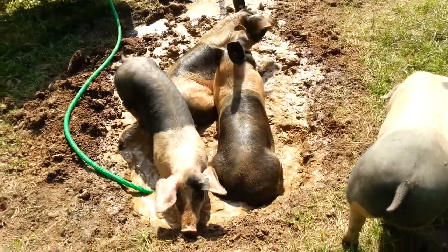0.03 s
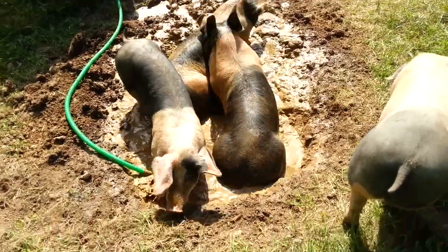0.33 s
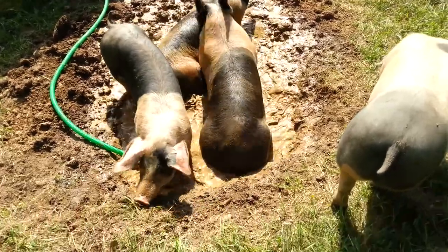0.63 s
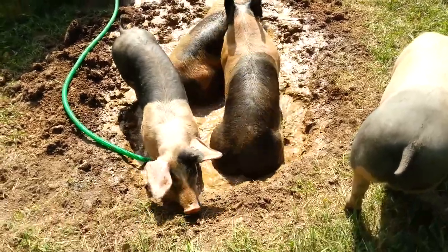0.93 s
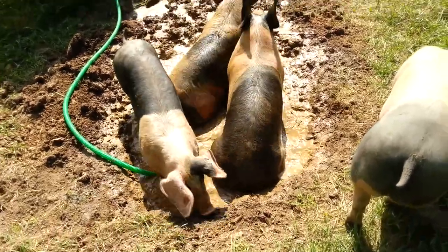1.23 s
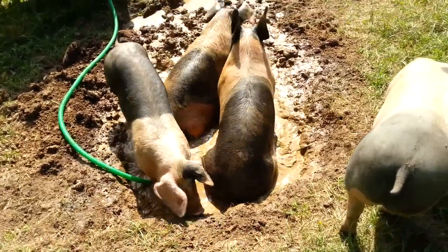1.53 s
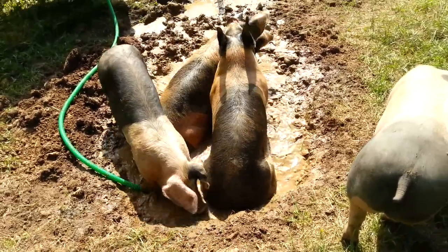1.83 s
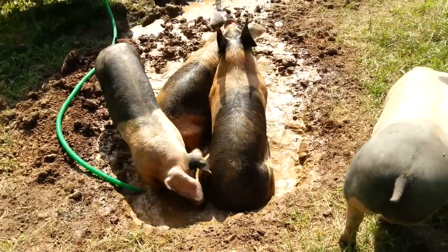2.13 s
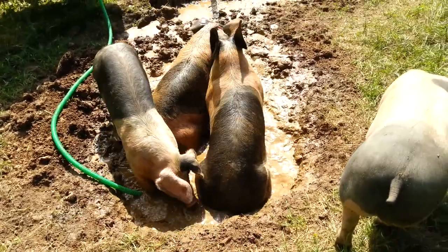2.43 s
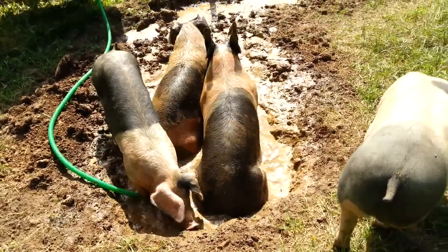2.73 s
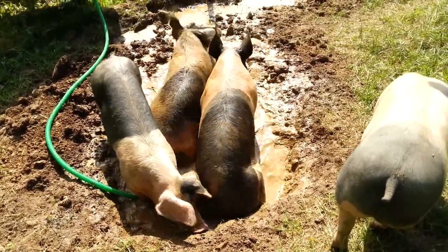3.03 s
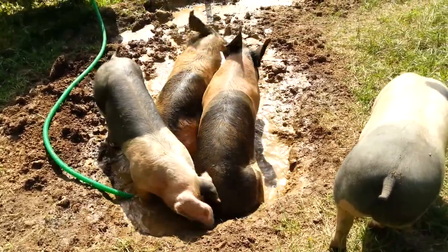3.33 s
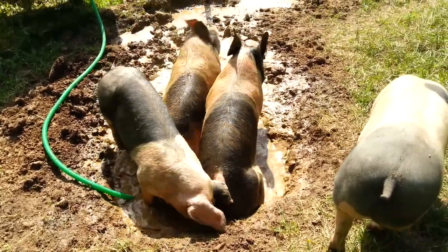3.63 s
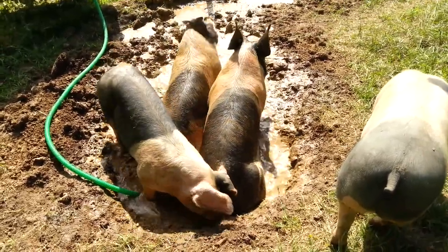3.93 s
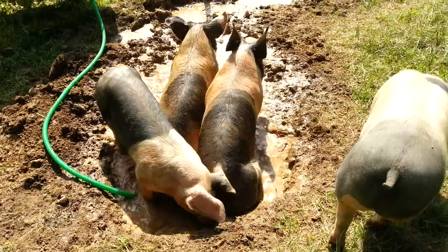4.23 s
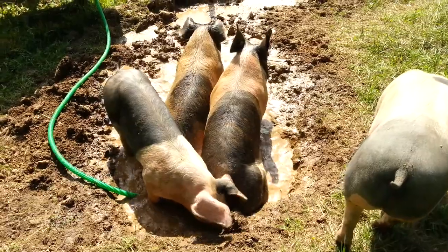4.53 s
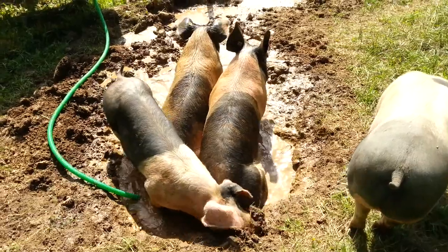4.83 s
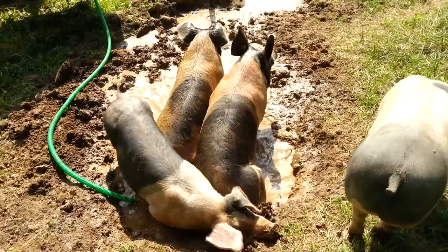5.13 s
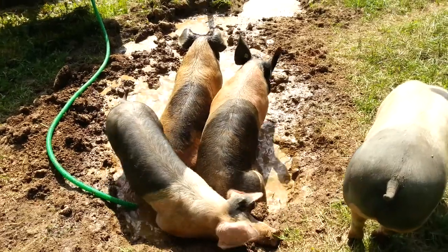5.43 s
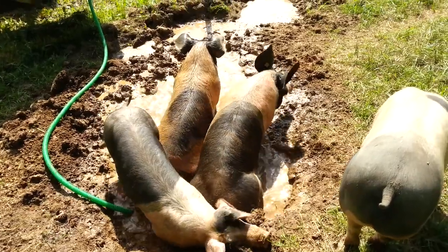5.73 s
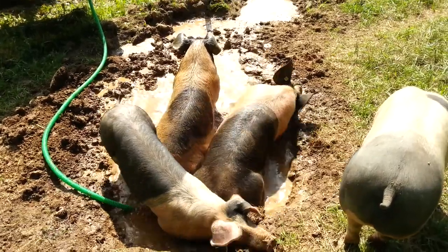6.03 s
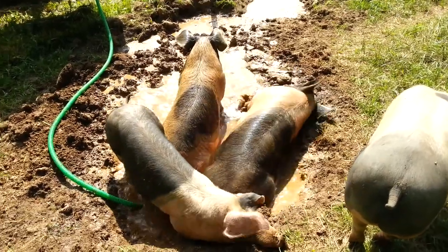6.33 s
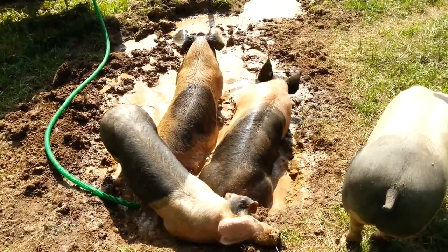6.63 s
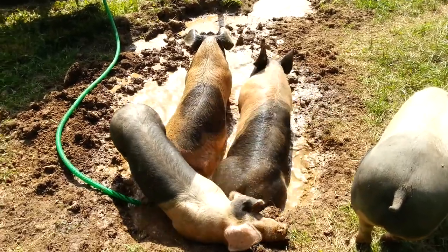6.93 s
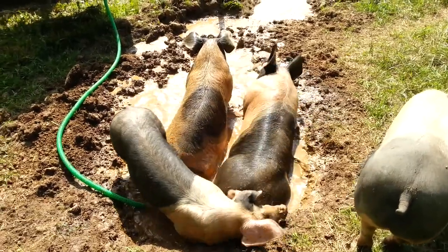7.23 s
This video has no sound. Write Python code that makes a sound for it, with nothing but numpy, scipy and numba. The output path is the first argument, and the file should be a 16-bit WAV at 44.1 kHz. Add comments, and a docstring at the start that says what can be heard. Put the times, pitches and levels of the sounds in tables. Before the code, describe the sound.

Pigs wade in a muddy puddle, sloshing and squelching with small plops, and one shakes itself in quick wet slaps.

```python
"""Pigs wade and root in a muddy puddle on a pasture, a few metres away, left of centre.
Their legs churn the water into clouds of small bubbles and fine spray; air pockets plop and gulp
in the mud, flung drops tick on wet ground and a rooting snout hisses. Just after three seconds one pig
shakes itself, slapping the wet about ten times a second. Behind: soft outdoor hiss and a faint whine."""
import sys
import numpy as np
from scipy import signal
from scipy.fft import rfft, irfft
from scipy.io import wavfile
from scipy.ndimage import uniform_filter1d, map_coordinates
from numba import njit

SR = 44100
rng = np.random.default_rng(int(sys.argv[2]) if len(sys.argv) > 2 else 0)


def materialize(psi):
    """Save the field psi as 16-bit PCM at rate SR to the path in sys.argv[1].

    A 1-D psi becomes a single channel; in a 2-D psi each row is a channel.
    """
    bounded = np.clip(np.atleast_2d(psi).T, -1, 1)
    quanta = np.round(bounded * 32767).astype(np.int16)
    wavfile.write(sys.argv[1], SR, quanta)


N = 325458
TIME_S = np.arange(N) / SR
FREQS_HZ = np.arange(N // 2 + 1) * SR / N

# spray spectrum: (frequency [Hz], gain [dB])
SPRAY_EQ = [(1500, 24), (3000, 4.5), (3900, 3), (5500, 1), (7000, 1.5), (8600, 1), (10000, -6.5),
            (14500, -1.5)]


def stirring():
    """Legs, flanks and snouts push through the puddle: gains of water, deep bubbles and spray."""
    # (peak time [s], rise [s], fall [s], water [dB], deep bubbles [dB], spray [dB])
    strokes = [(0.051, 0.094, 0.11, -36, -58, -38.5), (0.291, .09, 0.093, -30, -35.5, -35.5),
               (0.381, 0.036, 0.06, -28, -30, -35.5), (0.456, .045, 0.041, -29.5, -39, -37),
               (0.56, 0.087, 0.17, -35, -45, -38.5), (0.93, 0.31, 0.3, -43, -58.5, -50.5),
               (1.27, 0.16, 0.11, -47.5, -48, -49.5), (1.35, 0.043, 0.14, -40, -46.5, -48.5),
               (1.662, 0.16, 0.33, -35.5, -56.5, -40), (1.85, 0.02, 0.094, -45, -60.5, -43.5),
               (1.96, 0.015, .06, -42.5, -57, -50), (2.099, 0.073, 0.11, -38, -51, -52.5),
               (2.4, 0.17, 0.046, -48.5, -66, -53), (2.50, 0.085, 0.065, -41.5, -42.5, -45.5),
               (2.96, 0.041, 0.023, -46.5, -53, -56), (3.25, 0.26, 0.11, -47, -46, -49),
               (3.41, 0.14, 0.15, -35, -51, -36.5), (3.575, 0.067, 0.15, -33, -36, -35),
               (3.82, 0.068, 0.029, -35, -41, -35.5), (3.925, 0.08, 0.059, -32.5, -47, -39),
               (4.12, 0.061, 0.07, -45.5, -54.5, -45.5), (4.541, 0.05, 0.056, -50, -58.5, -52),
               (4.817, .012, 0.061, -50.5, -68, -53), (5.15, 0.03, 0.058, -48.5, -47, -49.5),
               (5.3, 0.074, 0.2, -49, -48.5, -53), (5.65, 0.089, .07, -43.5, -42.5, -42),
               (5.87, 0.22, 0.48, -37, -48, -54), (6.169, 0.028, 0.025, -30, -57, -35),
               (6.234, 0.034, 0.018, -40, -63, -34.5), (6.359, 0.035, 0.02, -27.5, -62, -36),
               (6.439, 0.025, .05, -32, -42, -43), (6.54, 0.06, 0.49, -42, -52.5, -49),
               (6.818, 0.025, 0.024, -40.5, -55, -39.5), (6.968, 0.15, 0.19, -38, -42.5, -49),
               (7.11, 0.032, 0.19, -40.5, -46.5, -50)]
    peak_s, rise_s, fall_s, *levels_db = np.transpose(strokes)
    return [np.hypot(swells(peak_s, rise_s, fall_s, db), undb(rest_db))
            for db, rest_db in zip(levels_db, (-58.5, -70.5, -56.5))]


def churn(water_gain, deep_gain, spray_gain):
    """Strokes stir the puddle in uneven surges; deep ones trap bigger bubbles."""
    surge = undb(2.7 * walk(rate_hz=58.28))
    deep = even(deep_bubbles(), window_s=0.11)
    body = undb(1.05) * water_gain * even(water(count=12000), window_s=0.04)
    body += undb(-2.5) * deep_gain * deep
    mist = undb(0.06 * walk(rate_hz=151.3) - 1) * even(spray(count=40000), window_s=0.1)
    drops = bubbles(3460, 12000, cycles=4.2, spread_db=3.5, bend=0.1, count=420)
    return surge * (body + spray_gain * (mist + undb(-14) * colour(drops, SPRAY_EQ)))


def water(count):
    """Mid-sized bubbles, damped by mud within a few cycles: a soft wash with thicker squelches."""
    # (frequency [Hz], gain [dB])
    water_eq = [(80, -51.5), (200, -15), (400, -30), (550, -4.5), (850, 3), (1400, 2.5), (1750, 0),
                (2150, 1), (2600, -8), (3200, -22.5), (5000, -52)]
    wash = bubbles(422.5, 3666, cycles=3.13, spread_db=3.5, bend=0.14, count=count)
    squelches = bubbles(450, 1895, cycles=4.6, spread_db=5, bend=0.27, count=600)
    return colour(wash + undb(-5) * squelches, water_eq)


def deep_bubbles():
    """Big bubbles ring low and die almost at once."""
    # (frequency [Hz], gain [dB])
    deep_eq = [(60, -43), (130, -33.5), (200, -6), (280, -10), (380, 4), (480, -2.5), (650, -3.5),
               (1200, -31.5)]
    return colour(bubbles(200, 560, cycles=1.54, spread_db=3, bend=0.22, count=1500), deep_eq)


def spray(count):
    """Tiny films burst; droplets patter on mud or ring in the water."""
    fizz = bubbles(2690, 13400, cycles=1.72, spread_db=-2.5, bend=0.047, count=count)
    patter = bubbles(7900, 14000, cycles=0.49, spread_db=3.5, bend=0.12, count=1500)
    droplets = bubbles(3400, 13000, cycles=9, spread_db=8, bend=0.091, count=1200)
    return colour(fizz + undb(-14) * patter + undb(-15) * droplets, SPRAY_EQ)


def bubbles(low_hz, high_hz, cycles, spread_db, bend, count):
    """Cloud of bubbles of random size and level, most rising in pitch; rms 1."""
    onsets, pitch = rng.random((count, 2)).T
    life, loudness, turn = rng.standard_normal((count, 3)).T
    hz = low_hz * (high_hz / low_hz) ** pitch
    gain = hz * undb(spread_db * np.minimum(loudness, 2.6))
    return unit(ring(onsets, hz, cycles * np.exp(life / 2), gain, bend * np.clip(turn + 0.5, -1, 2)))


@njit
def ring(onsets, hz, cycles, gain, bend):
    """Each bubble swells, decays by 1/e in `cycles` and bends in pitch; onsets span the scene as 0..1."""
    out = np.zeros(N)
    for k in range(len(onsets)):
        first, life_samples = int(onsets[k] * N), cycles[k] * SR / hz[k]
        fade = np.exp(-1 / life_samples)
        decay, phase = 1., 0.
        for i in range(min(int(6 * life_samples), N - first)):
            phase += 2 * np.pi * hz[k] / SR * (1 + bend[k] * i / (6 * life_samples))
            decay *= fade
            out[first + i] += gain[k] * (decay - decay ** 5) * np.sin(phase)
    return out


def slaps():
    """Wet skin hits water: a burst of bubbles and spray; a low thump grows as the blow squared."""
    # (peak time [s], water [dB], spray [dB], length [s])
    blows = [(0.209, -23.5, -40, 0.0088), (0.533, -30.5, -39, 0.0091), (0.932, -22, -38, 0.0023),
             (1.346, -27.5, -34.5, 0.018), (1.623, -24, -46, 0.0079), (1.688, -25, -38, 0.0083),
             (2.061, -26, -52, 0.0055), (2.507, -26.5, -44, 0.015), (3.066, -18, -25.5, 0.0085),
             (3.15, -17, -25.5, 0.013), (3.25, -12, -23, 0.0096), (3.347, -17, -24, 0.0093),
             (3.391, -24, -18.5, 0.0045), (3.422, -27, -22.5, 0.0077), (3.437, -12, -23.5, 0.01),
             (3.534, -15, -18.5, 0.0085), (3.553, -15.5, -34, .005), (3.616, -16, -25.5, 0.0071),
             (3.707, -25, -32, 0.0032), (3.72, -15.5, -24, 0.012), (3.98, -21.5, -29.5, 0.0078),
             (5.632, -24.5, -36.5, .012), (5.748, -26, -42, 0.011), (5.915, -32.5, -41.5, 0.016),
             (6.08, -50, -35, 0.012), (6.18, -24, -28, .007), (6.301, -35, -30.5, 0.0099),
             (6.387, -19.5, -41, 0.0033), (6.543, -25, -35, 0.0063), (6.719, -44, -35.5, 0.011),
             (7.252, -29, -46, 0.017)]
    body = even(water(count=20000), window_s=0.014)
    fizz = even(spray(count=30000), window_s=0.0096)
    rumble = unit(signal.sosfilt(signal.butter(2, 83, fs=SR, output="sos"), rng.standard_normal(N)))
    splash, thump = np.zeros((2, N))
    for peak_s, water_db, spray_db, length_s in blows:
        near = np.abs(TIME_S - peak_s) < 4 * length_s
        t = TIME_S[near] - peak_s
        width_s = length_s * np.where(t < 0, 0.45, 0.8)
        burst = np.exp(-np.abs(t / width_s) ** 0.94)
        splash[near] += burst * (undb(water_db - 0.5) * body[near] + undb(spray_db - 1.5) * fizz[near])
        thump[near] += burst * undb(2 * water_db - 24.5) * rumble[near]
    return splash, thump


def plops():
    """Big air pockets gulp as legs and bellies pull out of the mud."""
    # (time [s], pitch [Hz], level [dB], swell [s], decay [s], glide [oct/s])
    pockets = [(0.142, 332, -30.5, 0.0014, 0.0073, 16), (0.233, 1255, -13, 0.0042, 0.0011, 29),
               (0.234, 1950, -19.5, 0.0027, .0012, 10), (0.32, 378, -26, 0.005, .014, 4),
               (0.367, 370.5, -22.5, 0.0026, 0.02, 13), (0.382, 427, -30, .007, 0.0099, 15),
               (0.607, 1250, -19, 0.00072, 0.0075, 13), (0.931, 445, -26.5, 0.0012, 0.0072, -18),
               (0.955, 977, -23, 0.013, 0.0049, 45.5), (1.043, 650, -20.5, 0.01, 0.0027, -22),
               (1.112, 1466, -39.5, 0.00033, 0.014, 4.5), (1.342, 1270, -19.5, 0.0018, 0.00075, 18),
               (1.945, 440, -33, 0.0012, 0.011, 6), (2.062, 967, -21, 0.00041, 0.0076, 20),
               (2.149, 670, -21.5, .0005, 0.0031, -7), (2.613, 1330, -32.5, .004, 0.0036, -31),
               (2.967, 2350, -30, .004, .0011, -20), (3.064, 734, -11, 0.0052, 0.0019, -20),
               (3.151, 405, 0, 0.0023, 0.0019, -80), (3.248, 364, -11, .011, 0.0018, 44),
               (3.259, 2130, -11, 0.00065, 0.0019, -13), (3.342, 365, -17.5, 0.00055, 0.003, 33),
               (3.403, 1990, -11.5, 0.00038, .0026, 38), (3.427, 333, -17, .01, 0.0025, -36),
               (3.428, 1464, -16, 0.0084, 0.0031, 11), (3.486, 660, -20.5, .01, 0.0036, -9),
               (3.614, 372, -16, .0012, 0.0012, -27), (3.671, 385, -22.5, .01, 0.0033, 12),
               (3.975, 650, -13, 0.00027, 0.0056, 18), (3.978, 380, -27, 0.0029, 0.013, 23.5),
               (4.028, 1350, -37.5, .0024, .009, 1), (4.118, 1013, -25, 0.00026, 0.0054, -12),
               (4.212, 1080, -38.5, .0004, 0.0081, -4), (4.891, 226, -45.5, .0024, .006, -10),
               (5.432, 800, -29, 0.013, 0.0043, 27), (5.63, 1270, -9, 0.00074, 0.0024, -29),
               (5.698, 570, -35, .01, 0.019, 37), (5.824, 744, -29, .006, 0.0055, 1),
               (5.892, 1240, -26, .0022, 0.0069, -17), (5.896, 820, -18.5, 0.0011, 0.0028, 26),
               (6.346, 402, -24.5, .0046, 0.0018, 41), (6.347, 603, -26.5, 0.00025, .0075, 19),
               (6.539, 970, -23.5, .0023, .0025, 12), (6.918, 708, -27.5, 0.0088, .015, 24.5),
               (6.949, 1207, -30, 0.0099, 0.0056, 21), (6.987, 830, -21, 0.0019, 0.0092, 35),
               (7.072, 1150, -26.5, .01, 0.0033, 4), (7.252, 730, -23, 0.0054, 0.0047, 15)]
    out = np.zeros(N)
    for start_s, hz, db, swell_s, decay_s, glide_oct_per_s in pockets:
        add(out, start_s, undb(db) * pocket(hz, swell_s, decay_s, glide_oct_per_s))
    return out


def gurgles(water_gain, count):
    """Small air pockets pop at random, as loud as the water is stirred; low ones ring longer."""
    out = np.zeros(N)
    starts_s = (np.arange(count) + rng.random(count)) / count * TIME_S[-1]
    draws = np.clip(rng.standard_normal((count, 4)), -2, 2)
    for start_s, (pitch, loudness, softness, turn) in zip(starts_s, draws):
        hz = 928 * 2 ** (0.55 * pitch)
        gain = water_gain[int(start_s * SR)] * undb(4 + 3.5 * loudness)
        pop = pocket(hz, swell_s=0.0011 * np.exp(softness), decay_s=4.7 / hz, glide_oct_per_s=18 * turn)
        add(out, start_s, gain * pop)
    return out


def pocket(hz, swell_s, decay_s, glide_oct_per_s):
    """An air pocket rings, gliding as it changes size, unsteady in soft mud; a sudden one snaps."""
    t = TIME_S[:SR // 12]
    envelope = (1 - np.exp(-t / swell_s)) ** 2 * np.exp(-t / decay_s)
    envelope /= envelope.max()
    wobble_oct = 0.076 * unit(uniform_filter1d(rng.standard_normal(len(t)), size=100))
    glide_oct = np.clip(glide_oct_per_s * (t - t[envelope.argmax()]), -1, 1)
    pitch_hz = hz * 2 ** (glide_oct + wobble_oct)
    tone = np.sin(2 * np.pi * np.cumsum(pitch_hz) / SR)
    film_band = signal.butter(2, [600, 4500], "band", fs=SR, output="sos")
    snap = unit(signal.sosfilt(film_band, rng.standard_normal(len(t))))
    snap *= np.exp(-t / 0.0034 - swell_s / 0.0021)
    return envelope * tone + undb(-19) * snap


def ticks():
    """Flung drops and mud hit wet ground: a crack in one broad treble resonance."""
    # (time [s], level [dB], centre [Hz])
    landings = [(0.474, -36, 6300), (0.931, -45, 5000), (1.044, -33.5, 4900), (1.344, -34, 4900),
                (2.107, -37.5, 4560), (3.236, -34, 7700), (3.255, -21.5, 8040), (3.349, -25.5, 6440),
                (3.537, -46, 7600), (3.719, -46, 5500), (3.835, -32, 6130), (4.048, -32.5, 7350),
                (4.108, -34.5, 8450), (5.415, -30, 3770), (6.41, -27.5, 3870), (6.644, -38, 8100)]
    out, t = np.zeros(N), TIME_S[:SR // 50]
    envelope = np.exp(-t / 0.0007) + undb(-27) * np.exp(-t / 0.012)
    for start_s, db, hz in landings:
        crack = signal.lfilter(*signal.iirpeak(hz, Q=1.8, fs=SR), rng.standard_normal(len(t)) * envelope)
        add(out, start_s, undb(db) * crack / np.std(crack[:SR // 600]))
    return out


def snuffle():
    """A rooting snout squeezes air and water through mud: a soft sputtering hiss."""
    # (peak time [s], rise [s], fall [s], level [dB])
    pushes = [(4.9, .13, 0.16, -51.5), (6.08, 0.43, 0.12, -49), (6.42, 0.18, 0.12, -42.5),
              (7.08, 0.45, 0.44, -51)]
    # (frequency [Hz], gain [dB])
    snout_eq = [(1200, -11), (3000, -4.5), (4000, -0.5), (5300, -6), (7000, -7.5), (14000, -13.5)]
    sputter = undb(1.5 * walk(rate_hz=52))
    return swells(*np.transpose(pushes)) * sputter * colour(rng.standard_normal(N), snout_eq)


def place(x):
    """Puddle left of centre; splashes come from different spots, so the delay between the ears hops."""
    # (frequency [Hz], left [dB], right [dB])
    ear_eq = [(350, 2.4, -0.9), (715, 0.3, -2.3), (1440, 2, -4.5), (2600, 5.5, 0), (5140, 11.5, -0.5),
              (12000, 8, -2)]
    hz, left_db, right_db = np.transpose(ear_eq)
    lag_s = 5.5e-5 * walk(rate_hz=120)
    delayed = map_coordinates(x, [np.arange(N) - lag_s * SR], order=3)
    left = equalise(x, np.c_[hz, left_db])
    right = equalise(delayed, np.c_[hz, right_db])
    tail = np.array([field_echo(highpass(x, hz=700, order=2), decay_s=0.017) for _ in range(2)])
    return np.array([left, right]) + undb(-9.5) * tail


def field_echo(x, decay_s):
    """Short diffuse tail returned by the open field."""
    t = TIME_S[:16384]
    response = rng.standard_normal(len(t)) * np.exp(-t / decay_s)
    return signal.fftconvolve(x, response / np.linalg.norm(response))[:N]


def pasture():
    """Outdoor hiss, wide in the treble, with a faint thin whine."""
    # (frequency [Hz], gain [dB])
    hiss_eq = [(25, -3), (60, -18), (110, -25), (160, -9), (230, -12), (350, -11), (900, -8), (2000, -2.5),
               (3000, -5), (6000, -7.5), (14500, -12)]
    mid, side = (colour(rng.standard_normal(N), hiss_eq) for _ in range(2))
    side = irfft(rfft(side) * np.minimum(FREQS_HZ / 3000, 1), N)
    whine_band = np.exp(-((FREQS_HZ - 3226) / 12) ** 2)
    whine = unit(irfft(rfft(rng.standard_normal(N)) * whine_band, N))
    return undb(-51) * np.array([mid + side, mid - side]) + undb(-66.5) * whine


def swells(peak_s, rise_s, fall_s, levels_db):
    """Gain of overlapping movements that build and ebb; powers add."""
    t = TIME_S[::32]
    roundness = 1.5  # 1: pointed crest, 2: bell
    power = sum(undb(db) ** 2 * np.exp(-2 * np.abs((t - at) / np.where(t < at, up, down)) ** roundness)
                for at, up, down, db in zip(peak_s, rise_s, fall_s, levels_db))
    return np.interp(TIME_S, t, np.sqrt(power))


def walk(rate_hz):
    """Random steps, smoothed twice; rms 1."""
    size = int(SR / rate_hz)
    steps = np.repeat(rng.standard_normal(2000)[:N // size + 1], size)
    return unit(uniform_filter1d(uniform_filter1d(steps, size), size)[:N])


def even(x, window_s):
    """Hold the running rms near 1, keeping faster detail."""
    size = max(int(window_s * SR / 2), 8)
    power = uniform_filter1d(uniform_filter1d(unit(x) ** 2, size), size)
    return unit(x) / np.sqrt(np.abs(power) + 1e-6)


def equalise(x, eq):
    """Filter by (frequency [Hz], gain [dB]) points."""
    hz, db = np.transpose(eq)
    return irfft(rfft(x) * undb(np.interp(np.log(FREQS_HZ + 1), np.log(hz), db)), N)


def colour(x, eq):
    """Equalise, then scale to rms 1."""
    return unit(equalise(x, eq))


def highpass(x, hz, order):
    """Butterworth bass cut."""
    return signal.sosfilt(signal.butter(order, hz, "high", fs=SR, output="sos"), x)


def add(out, start_s, sound):
    """Mix in place."""
    start = int(start_s * SR)
    part = sound[:max(N - start, 0)]
    out[start:start + len(part)] += part


def undb(db):
    """Decibels to gain."""
    return 10 ** (np.asarray(db) / 20)


def unit(x):
    """Scale to rms 1."""
    return x / np.sqrt(np.mean(x ** 2) + 1e-18)


def scene():
    """Pigs in the puddle over the quiet field; shallow water radiates little bass."""
    water_gain, deep_gain, spray_gain = stirring()
    splash, thump = slaps()
    splashing = churn(water_gain, deep_gain, spray_gain) + splash + ticks() + snuffle()
    gulping = plops() + gurgles(water_gain, count=90)
    puddle = highpass(splashing, hz=228, order=6) + highpass(gulping, hz=175, order=3) + thump
    return place(puddle) + pasture()


def record(dry):
    """Clip at full scale, then low-pass steeply."""
    cutoff_hz = 14700
    return signal.sosfilt(signal.ellip(10, 0.1, 80, cutoff_hz, fs=SR, output="sos"), np.clip(dry, -1, 1))


dry = scene()
out = record(dry)
materialize(out)
```